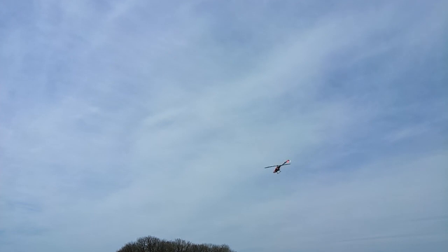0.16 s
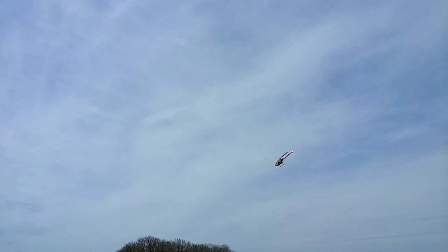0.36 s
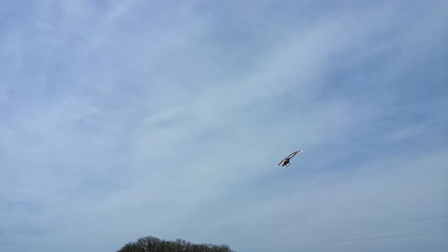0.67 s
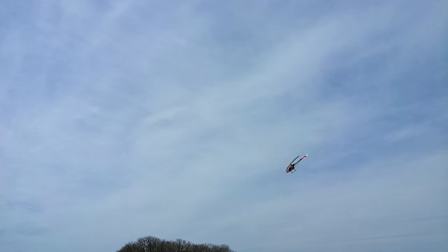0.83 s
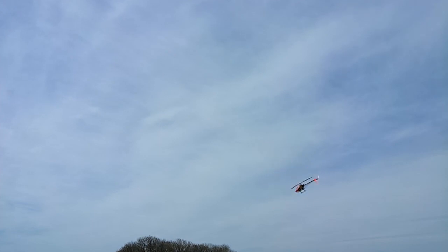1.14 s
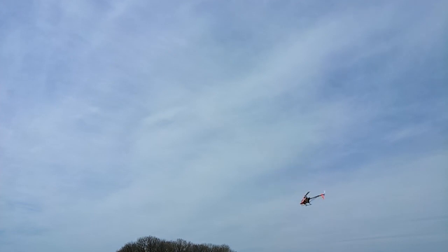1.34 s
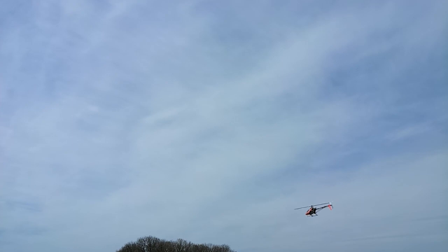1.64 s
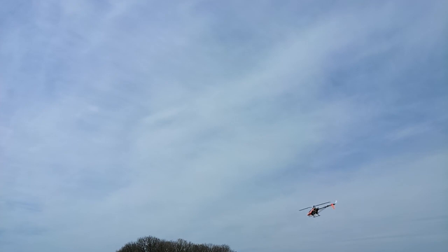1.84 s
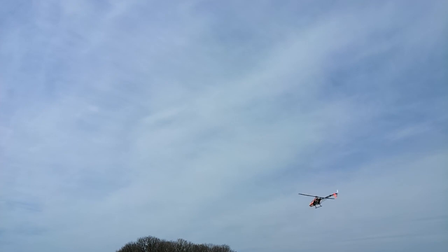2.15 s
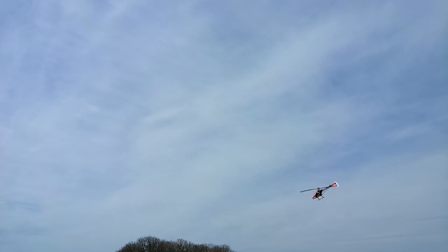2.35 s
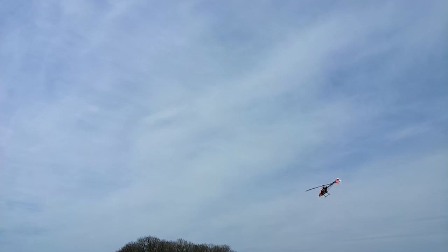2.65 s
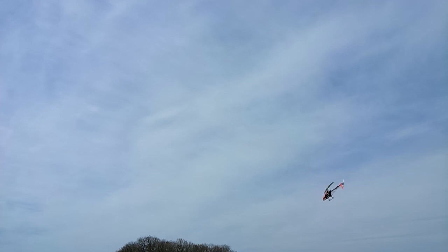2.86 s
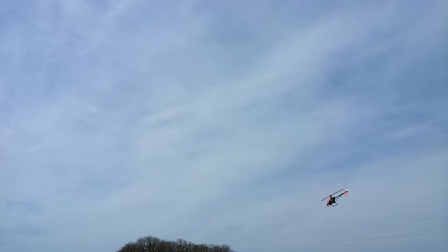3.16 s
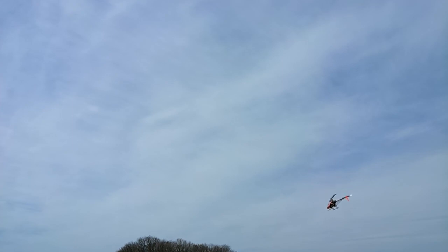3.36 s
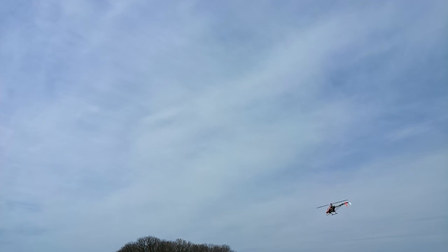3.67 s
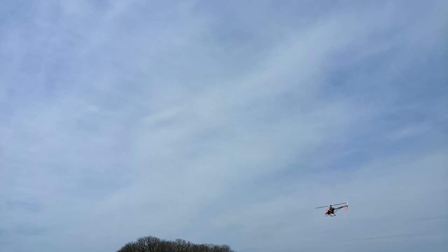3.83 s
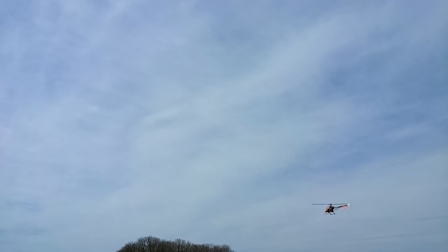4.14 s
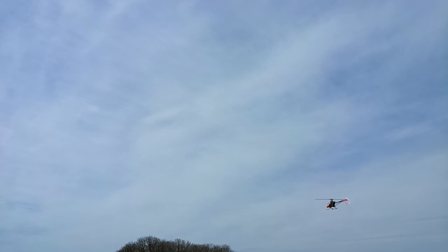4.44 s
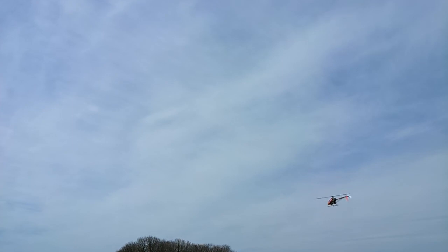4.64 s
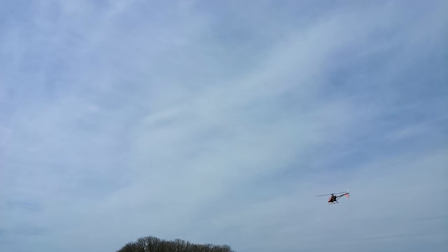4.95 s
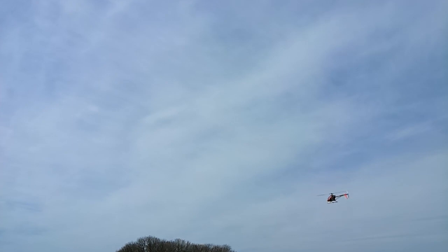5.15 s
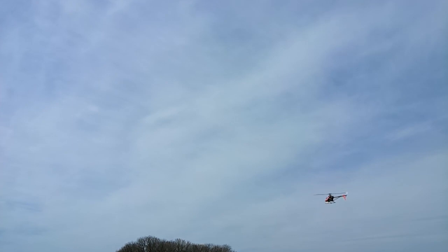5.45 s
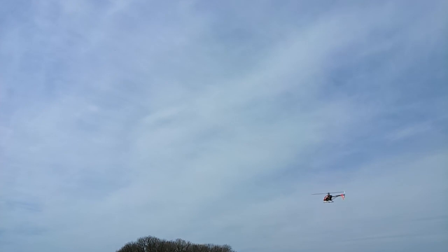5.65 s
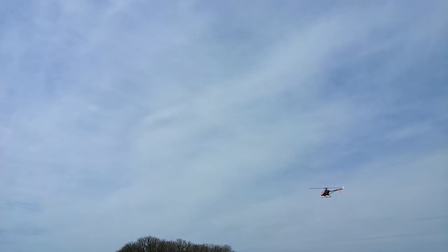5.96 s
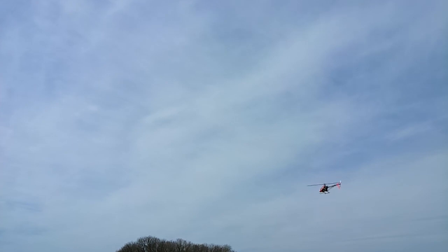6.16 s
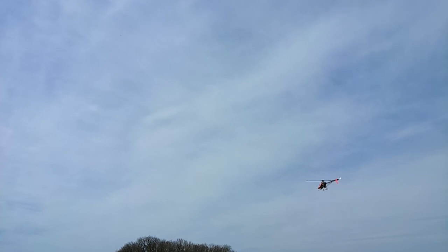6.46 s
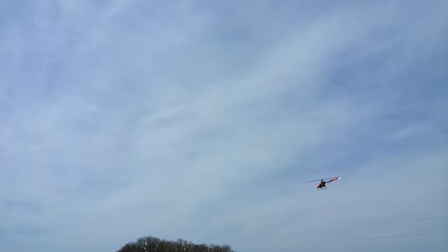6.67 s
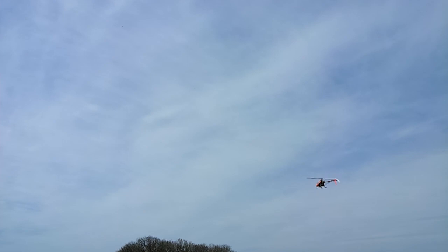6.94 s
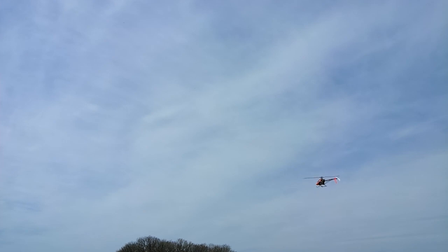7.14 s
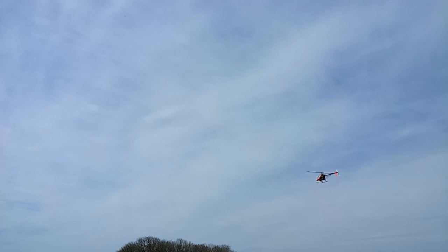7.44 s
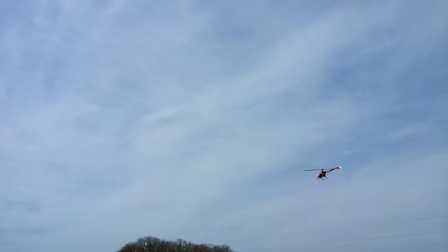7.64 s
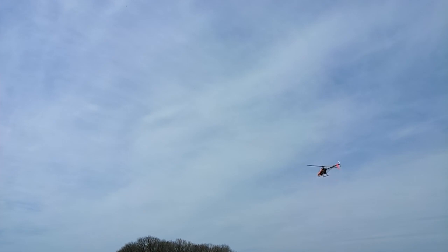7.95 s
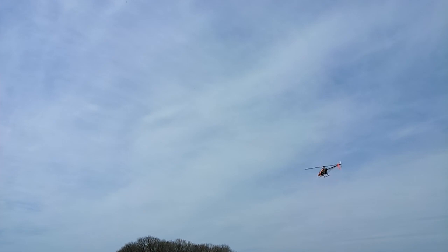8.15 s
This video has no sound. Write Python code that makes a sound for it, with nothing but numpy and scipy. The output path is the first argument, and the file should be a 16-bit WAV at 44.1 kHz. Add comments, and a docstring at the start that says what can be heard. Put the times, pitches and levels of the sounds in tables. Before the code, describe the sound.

Outdoors in an open field, a small electric model helicopter hovers at some distance, giving a nearly steady high gear whine and an airy blade hiss that flutter slightly. Wind strikes the bare stereo microphone: lighter bumps at first, then heavy thumps, low rumble and crackle from about two seconds, separate on each side and stronger on the right. The loudest gusts distort and briefly duck everything; the wind eases near the end while the whine continues.

```python
"""A small electric model helicopter whines over the hiss of its blades, while gusts thump and crackle left and right.
Gears, motor, tail drive and rotor are sums of sines locked to one drive speed; the hiss is noise throbbing
with the rotor. The wind is streams of short pressure swings and a low rumble, separate at each of a camera's
two microphone ports, over a faint field murmur. A gain control ducks everything after loud peaks, then it clips."""
import sys
import numpy as np
from scipy import signal
from scipy.fft import rfft, irfft, next_fast_len
from scipy.io import wavfile
from scipy.ndimage import uniform_filter1d, map_coordinates

SR = 44100
rng = np.random.default_rng(int(sys.argv[2]) if len(sys.argv) > 2 else 0)


def int16_out(signal):
    """Quantize to a 16-bit WAV file."""
    q = np.round(np.clip(np.atleast_2d(signal).T, -1, 1) * 32767)
    wavfile.write(sys.argv[1], SR, q.astype(np.int16))


N = 366030


def amp(db):
    """Gain of a level in dB."""
    return 10 ** (np.asarray(db) / 20)


def unit(x):
    """x at rms 1."""
    return x / np.sqrt(np.mean(x ** 2) + 1e-20)


def along(points, hz):
    """Interpolate (f/Hz, value) points on a log frequency axis."""
    f, v = np.transpose(points)
    return np.interp(np.log(hz + 1), np.log(f + 1), v)


def curves(rows):
    """One value per sample for each column after the time."""
    s, *cols = np.transpose(rows)
    return [np.interp(np.arange(N) / SR, s, c) for c in cols]


def wobble(rate_hz):
    """Smooth random curve, rate_hz knots a second."""
    knots = rng.standard_normal(int(N * rate_hz / SR) + 4)
    return map_coordinates(knots, [np.arange(N) * rate_hz / SR])


def filtered(x, response):
    """x times a complex response of frequency."""
    m = next_fast_len(N + 8192)
    return irfft(rfft(x, m) * response(np.fft.rfftfreq(m, 1 / SR)), m)[..., :N]


# main gear mesh rate: t/s, f/Hz
MESH_SPEED = [(0, 3717), (.21, 3721), (.81, 3691), (.91, 3683), (1.02, 3657), (1.3, 3629), (1.44, 3630),
              (1.74, 3648), (2, 3650), (2.39, 3693), (2.6, 3684), (2.9, 3655), (3.11, 3625), (3.2, 3624),
              (4.18, 3649), (5.2, 3646), (6.62, 3672), (7.36, 3657), (7.76, 3674), (8.3, 3674)]


def mesh_turns():
    """Phase of the main gear mesh in cycles; its speed wanders slightly and drives every shaft."""
    return np.cumsum(curves(MESH_SPEED)[0] + 2.5 * wobble(9)) / SR


def shaft(turns, tones, flutter_db, blur_rad):
    """Sines at multiples of a shaft's speed; moving air makes each flutter in level and phase."""
    total = 0
    for k, db in tones:
        level = amp(db + flutter_db * wobble(12))
        total = total + level * np.sqrt(2) * np.sin(2 * np.pi * k * turns + blur_rad * wobble(30))
    return total


PINION_TEETH, GEAR_TEETH, MESH_PER_TAIL_TURN = 11, 112, 29.06
# what faces the camera as the machine turns: t/s, tail drive level/dB, tail gear level/dB, main gear level/dB
FACING = [(0, -4.5, -27, 3.5), (.7, 0, -9, 4.5), (.85, 0.5, -5.5, 5), (1.3, -1, -1.5, -1),
          (1.8, 0, 0.5, 0.5), (2.5, -4.5, -3.5, 1), (3.3, 0.5, 2.5, 0.5), (4.2, 0, 3, 1),
          (5.1, -0.5, 2, -4), (6, 2.5, 2.5, 1.5), (6.9, -1.5, -1.5, 1), (7.6, 0, 1.5, 1),
          (8.3, -1.5, -2, 3)]
# tones of main gear mesh, tail drive, tail gears, motor, rotor: multiple of shaft speed, relative level/dB
MESH_TONES = [(1, -16), (2, -22), (3, -22)]
TAIL_TONES = [(2, -14), (4, -15), (6, -22), (8, -22), (12, -16.5), (22, -29.5), (26, -37), (27, -36),
              (31, -28), (33, -23), (39, -18.5), (40, -16), (41, -20.5), (80, -22)]
TAIL_GEAR_TONES = [(19.98, -11.5), (20.72, -21), (19, -17), (18.16, -20)]
MOTOR_TONES = [(6, -27), (10, -28), (16, -28), (21, -27), (23, -27), (24, -25), (28, -26), (29, -27),
               (30, -27), (31, -27), (32, -27), (34, -27)]
ROTOR_TONES = [(64, -26), (111, -28), (134, -29), (142, -23), (144, -29)]


def drive_whine(mesh):
    """Gears, tail drive, motor and rotor sing at fixed ratios of the mesh rate."""
    tail_db, tail_gear_db, gear_db = curves(FACING)
    tail = mesh / MESH_PER_TAIL_TURN
    whine = amp(gear_db) * shaft(mesh, MESH_TONES, flutter_db=3, blur_rad=1.1)
    whine += amp(tail_db) * shaft(tail, TAIL_TONES, flutter_db=3, blur_rad=0.64)
    whine += amp(tail_gear_db) * shaft(tail, TAIL_GEAR_TONES, flutter_db=3, blur_rad=1.05)
    whine += shaft(mesh / PINION_TEETH, MOTOR_TONES, flutter_db=3.5, blur_rad=0.41)
    whine += shaft(mesh / GEAR_TEETH, ROTOR_TONES, flutter_db=3, blur_rad=0.64)
    return whine


# throb of the hiss: multiple of rotor speed, depth [0-1]
THROB = [(1, .04), (2, .13), (3, .06), (4, .08), (6, .05)]
# left-right likeness of the hiss: f/Hz, likeness [0-1]
LIKENESS = [(300, .6), (2500, .7), (5000, .58), (8000, .42), (13000, .3)]


def blade_hiss(rotor):
    """Patchy noise swelled by each passing blade, part shared by the ports and part separate."""
    throb = 1 + sum(depth * np.cos(2 * np.pi * (k * rotor + rng.random())) for k, depth in THROB)
    spectra = signal.stft(rng.standard_normal((3, N + 512)), nperseg=512)[2]
    patches = uniform_filter1d(rng.standard_normal(spectra.shape[1:]), size=12, axis=0)
    patches = unit(uniform_filter1d(patches, size=10, axis=1))
    noise = signal.istft(spectra * amp(1.47 * patches), nperseg=512)[1][:, :N]
    shared, *own = throb * noise
    share = lambda hz: np.clip(along(LIKENESS, hz), 0, 1)
    common = filtered(shared, lambda hz: np.sqrt(share(hz)))
    return common + filtered(np.array(own), lambda hz: np.sqrt(1 - share(hz)))


# colour of each port towards the helicopter: f/Hz, level/dB
LEFT_COLOUR = [(100, -30.5), (250, -23), (1000, -12.5), (2300, -5.5), (3900, -9), (4700, -9), (5600, -15.5),
               (6100, -62), (6700, -13.5), (7400, -9), (8600, -7), (11000, 2), (12200, 2), (14300, -10.5),
               (14800, -20.5)]
RIGHT_COLOUR = [(100, -36), (250, -23), (1000, -18), (2100, -4), (3100, -6), (4600, 0), (5200, -6),
                (5700, -10.5), (6700, -13.5), (7300, -12), (8500, -13.5), (11000, -21), (12800, -31),
                (13800, -53)]
# phase by which the left port leads: f/Hz, lead [rad]
LEFT_LEAD = [(0, 7), (260, -4.5), (1380, -3), (3790, 0.57), (6120, 2.5), (9300, 7), (12400, 8.5),
             (13600, -2), (14000, 18), (14500, 1)]


def helicopter():
    """Whine and blade hiss from one drive, coloured and phase-shifted differently by the two ports."""
    mesh = mesh_turns()
    source = drive_whine(mesh) + blade_hiss(mesh / GEAR_TEETH)
    half_lead = lambda hz: np.exp(.5j * np.interp(hz, *np.transpose(LEFT_LEAD)))
    left = lambda hz: amp(along(LEFT_COLOUR, hz)) * half_lead(hz)
    right = lambda hz: amp(along(RIGHT_COLOUR, hz)) / half_lead(hz)
    return arriving(filtered(source, lambda hz: np.array([left(hz), right(hz)])))


# helicopter at the ports, before port_db: t/s, level/dB
ARRIVAL = [(0, -29.5), (.14, -25.5), (.37, -32), (.44, -26.5), (.7, -29), (.91, -24.5), (1.03, -28),
           (1.32, -24), (1.62, -26), (1.86, -25), (1.95, -22), (2.27, -26), (2.51, -23), (3.11, -25),
           (3.31, -22), (3.53, -24.5), (3.85, -28.5), (4.46, -24), (4.73, -28.5), (5.14, -24.5),
           (5.23, -27), (5.69, -26.5), (5.82, -29), (5.96, -21), (6.07, -25.5), (6.33, -27), (6.45, -25),
           (6.84, -26), (6.91, -24), (7.35, -27.5), (7.62, -21.5), (7.83, -30), (8.01, -23.5),
           (8.29, -27.5)]


def arriving(ports):
    """Moving air shakes the treble hardest: its quick wavers are deeper than those of the lower part."""
    level_db = curves(ARRIVAL)[0]
    waver_db = 1.6 * wobble(20)
    treble = filtered(ports, lambda hz: 1 / (1 + (6200 / (hz + 1)) ** 12))
    body_db = level_db + 0.48 * waver_db + 1.26 * wobble(30)
    treble_db = level_db + waver_db + 2.0 * wobble(34)
    port_db = 13
    return amp(port_db) * (amp(treble_db) * treble + amp(body_db) * (ports - treble))


# sharpest eddies, before the port leak: t/s, peak level/dB, f/Hz, port [0 left, 1 right]
SLAPS = [(0.732, 3, 890, 1), (1.509, 0, 730, 1), (1.598, 7, 796, 1), (1.626, 4.5, 756, 1),
         (1.698, 7.5, 520, 0), (2.012, 7, 580, 1), (2.082, 6, 580, 1), (2.221, 5, 656, 1),
         (2.355, 21, 960, 1), (2.391, 10.5, 1020, 1), (2.497, 13, 1045, 1), (2.514, 15.5, 900, 1),
         (2.722, 13, 470, 0), (2.889, 14, 800, 1), (2.902, 15, 1130, 1), (3.012, 20.5, 860, 1),
         (3.107, 11, 794, 1), (3.22, 9, 840, 1), (3.6, 4.5, 640, 1), (3.81, 11, 885, 1),
         (3.836, 15, 890, 1), (4.046, 8, 1430, 1), (4.095, 15, 710, 1), (4.113, 19, 1200, 1),
         (4.581, 12.5, 690, 1), (4.808, 10.5, 715, 1), (4.888, 13, 950, 1), (4.909, 19, 780, 1),
         (5.055, 2, 720, 1), (5.102, 13, 835, 1), (5.166, 27, 825, 1), (5.228, 16, 855, 1),
         (5.252, 21, 1100, 1), (5.287, 23, 1200, 1), (5.413, 1.5, 745, 1), (5.506, 22, 850, 1),
         (5.533, 15, 760, 1), (5.744, 12.5, 600, 0), (5.895, 17, 1020, 1), (5.949, 16, 570, 1),
         (6.029, 18, 810, 1), (6.218, 21.5, 1160, 1), (6.268, 10, 750, 1), (6.296, 12.5, 1260, 1),
         (6.481, 11, 820, 1), (6.494, 15, 1210, 1), (7.001, 8, 810, 1), (7.291, 3, 670, 1),
         (7.379, 12.5, 724, 1), (7.504, 3.5, 740, 1), (7.554, 3.5, 740, 1), (7.734, 1.5, 580, 1),
         (7.806, 4.5, 670, 1), (7.857, 0, 623, 1)]
# low wind rumble, shape only: f/Hz, level/dB
RUMBLE = [(20, -26), (60, -50), (130, -8.5), (250, 0.5), (400, -4), (700, -20.5), (1500, -33), (4000, -120)]


def buffet(port, base_hz, eddy_db, crackle_db, count=1700):
    """Random stream of eddies over one port; in stronger wind they are faster, so brighter."""
    level_db = wind_db(port)
    s = np.sort(rng.random(count)) * (N - 1) / SR
    size, tone = rng.exponential(size=count), rng.standard_normal(count)
    local_db = (level_db + 4 * wobble(45))[(s * SR).astype(int)]
    hz = np.clip(base_hz * amp(0.22 * (local_db + 18.5) + 0.46 * size + 2.5 * tone), 90, 2500)
    stream = eddies(s, local_db + eddy_db + 3.34 * np.minimum(size, 3.5), hz, cycles=1.0)

    slap_s, slap_db, slap_hz, _ = np.transpose([row for row in SLAPS if round(row[-1]) == port])
    sharp = eddies(slap_s, slap_db, slap_hz, cycles=0.95)

    rumble = unit(filtered(rng.standard_normal(N), lambda f: amp(along(RUMBLE, f))))
    rumble = amp(level_db - 10.0 + 4.5 * wobble(30)) * rumble

    # eddies shed a crackle of small fast ones, growing faster than the wind
    shed_s = s[:, None] + .004 * rng.exponential(size=(count, 2))
    fine_db = local_db[:, None] + crackle_db + 0.65 * (local_db[:, None] + 13.5)
    fine_db = fine_db + 3 * rng.exponential(size=(count, 2))
    fine_hz = 2.75 * base_hz * amp(3.3 * rng.standard_normal((count, 2)))
    crackle = eddies(shed_s.ravel(), fine_db.ravel(), fine_hz.ravel(), cycles=1.0)

    air = stream + sharp + crackle + rumble
    # the port leaks slow pressure away
    return filtered(air, lambda f: (1j * f / (95 + 1j * f)) ** 2)


def eddies(s, db, hz, cycles):
    """Each eddy is a swing of pressure a cycle or two long, fastest at its peak and slowing after it."""
    t = np.arange(-SR // 100, SR // 50) / SR
    u = t * hz[:, None]  # cycles from the peak
    start, slow = rng.random((2, len(s), 1))
    shape = np.where(u < 0, np.exp(-(u / (0.32 * cycles)) ** 2), np.exp(-abs(u / cycles) ** 1.8))
    swing = np.cos(2 * np.pi * (start + u / (1 + .5 * slow * abs(u) + 0.17 * np.maximum(u, 0))))
    pulses = amp(db)[:, None] * shape * swing
    at = np.round(s * SR).astype(int)[:, None] + np.arange(len(t))
    return np.bincount(at.ravel(), pulses.ravel(), N + SR)[SR // 100:][:N]


# steady wind, before the 0.93 dB scaling: t/s, left level/dB, right level/dB
WIND = [(0, -37, -26), (.13, -34, -38), (.3, -31, -23.5), (.76, -33, -26), (.85, -37.5, -48),
        (1.34, -37, -44), (1.62, -27, -16), (1.95, -27.5, -28), (2.17, -27, -29), (2.3, -17, -7),
        (2.82, -21, -28), (2.95, -23, -2), (3.2, -15, -12.5), (3.42, -40, -17), (3.49, -33, -37),
        (3.57, -35, -33), (3.7, -8.5, -9.5), (3.85, -16, -8), (4.2, -30, -19.5), (4.75, -19, -17),
        (5.0, -15, -7.5), (5.56, -7, -2), (5.87, -21.5, -17.5), (6.15, -21.5, -19), (6.39, -26, -30.5),
        (7.01, -26.5, -11), (7.33, -35, -35), (7.95, -28, -11), (8.15, -36, -38), (8.29, -35, -16.5)]
# gusts that hit one port: middle t/s, length [s], peak level/dB, port [0 left, 1 right]
GUSTS = [(0.01, 0.04, -13, 1), (0.196, 0.06, -16, 1), (0.286, 0.03, -14, 1), (0.302, 0.051, -15.5, 0),
         (0.504, 0.062, -19.0, 0), (0.522, 0.021, -17.5, 1), (0.632, 0.062, -15.5, 1),
         (0.755, 0.07, -13.5, 1), (0.803, 0.1, -18, 0), (0.904, 0.048, -24.5, 1), (1.274, 0.074, -28, 0),
         (1.416, 0.046, -17.5, 1), (1.505, 0.026, -13, 1), (1.53, 0.079, -26, 0), (1.592, 0.031, -7.5, 1),
         (1.705, 0.11, -7.5, 0), (1.78, 0.082, -8, 1), (1.995, 0.036, -10, 1), (2.09, 0.042, -12.5, 1),
         (2.184, 0.1, -15, 0), (2.248, 0.051, 1, 1), (2.28, 0.075, -1.5, 0), (2.357, 0.053, -1.5, 1),
         (2.516, 0.088, -2.5, 1), (2.562, 0.055, 1.5, 0), (2.612, 0.17, -3, 0), (2.658, 0.075, -10, 1),
         (2.73, 0.049, -8, 0), (2.76, 0.047, -5.5, 1), (2.839, 0.05, -8.0, 0), (2.894, 0.05, 3, 1),
         (3.01, 0.05, -5, 1), (3.07, 0.18, -3, 0), (3.17, 0.058, -4.5, 0), (3.219, 0.021, -5, 1),
         (3.35, 0.14, -13, 1), (3.413, 0.078, -15.0, 0), (3.634, 0.056, -6.5, 1), (3.742, 0.031, -3, 1),
         (3.804, 0.076, -2.5, 0), (3.825, 0.037, -3, 1), (3.903, 0.031, -10, 0), (3.994, 0.074, -12.5, 1),
         (3.996, 0.041, -12.0, 0), (4.077, 0.11, -6.0, 1), (4.15, 0.16, -14.0, 0), (4.196, 0.044, -12.5, 1),
         (4.294, 0.045, -20, 1), (4.375, 0.041, -14.5, 0), (4.405, 0.03, -5, 1), (4.458, 0.04, -4.5, 1),
         (4.452, 0.16, -13.0, 0), (4.573, 0.075, -8, 1), (4.697, 0.13, -9.5, 0), (4.71, 0.043, -12.5, 1),
         (4.902, 0.067, 2, 1), (4.9, 0.075, -14, 0), (5.105, 0.033, 2, 1), (5.123, 0.1, -12, 0),
         (5.19, 0.062, -0.5, 1), (5.365, 0.04, -11, 1), (5.487, 0.073, -4, 0), (5.52, 0.12, -4.5, 1),
         (5.67, 0.057, -16, 1), (5.696, 0.028, -8, 0), (5.792, 0.078, -2, 0), (5.887, 0.036, -9.0, 1),
         (5.952, 0.042, -18, 0), (6.04, 0.056, -1, 0), (6.035, 0.097, 1.5, 1), (6.125, 0.024, 1, 1),
         (6.137, 0.068, -4, 0), (6.223, 0.084, 1, 1), (6.27, 0.088, -9, 0), (6.346, 0.054, -10.5, 1),
         (6.483, 0.029, 0.5, 1), (6.552, 0.1, -16, 0), (6.559, 0.19, -5.5, 1), (6.7, 0.067, -13.5, 0),
         (6.907, 0.085, -15, 1), (6.95, 0.15, -20, 0), (7.037, 0.18, -12.5, 1), (7.09, 0.067, -16, 0),
         (7.282, 0.047, -11.5, 1), (7.39, 0.029, -6, 1), (7.416, 0.056, -18, 0), (7.532, 0.17, -13.5, 1),
         (7.654, 0.038, -14, 1), (7.733, 0.02, -9.5, 1), (7.805, 0.021, -11, 1), (7.843, 0.091, -23, 0),
         (7.866, 0.031, -14.5, 1), (7.937, 0.066, -10, 1)]


def wind_db(port):
    """Steady wind with a random sway, and over it the flat-topped gusts that hit this port, summed as power."""
    sway_db = 3.5 * wobble(24)
    power = amp(1.86 * (curves(WIND)[port] + sway_db))  # 1.86 = 2 * 0.93
    t = np.arange(N) / SR
    for s, length, db, _ in [row for row in GUSTS if round(row[-1]) == port]:
        near = slice(max(round((s - 2 * length) * SR), 0), round((s + 2 * length) * SR))
        power[near] += amp(2 * db) * np.exp(-abs(2 * (t[near] - s) / length) ** 2.8)
    return 10 * np.log10(power)


# murmur of the open field, shape only: f/Hz, level/dB
FIELD = [(60, -12), (250, -7.5), (900, -7), (1700, 10.5), (2600, -57)]


def field():
    """Faint steady noise, different at each port."""
    noise = rng.standard_normal((2, N))
    return amp(-43.0) * unit(filtered(noise, lambda hz: amp(along(FIELD, hz)) * (hz < 4000)))


DUCK_FROM_DB, DUCK_DB_PER_MEAN_DB_OVER, DUCK_MEMORY_S = -4, 4.25, .18


def ducked(x):
    """Every 10 ms the gain control lowers the gain by how far its recent output peaks went over the threshold."""
    step = SR // 100
    blocks = abs(x[:, :N // step * step]).reshape(2, -1, step)
    peaks_db = 20 * np.log10(blocks.max(axis=(0, 2)) + 1e-9)
    keep, mean_over_db, gain_db = np.exp(-step / SR / DUCK_MEMORY_S), 0, []
    for peak_db in peaks_db:
        gain_db.append(-DUCK_DB_PER_MEAN_DB_OVER * mean_over_db)
        output_db = min(peak_db + gain_db[-1], 0)
        mean_over_db = keep * mean_over_db + (1 - keep) * max(output_db - DUCK_FROM_DB, 0)
    return x * amp(np.interp(np.arange(N), step * np.arange(len(gain_db)), gain_db))


def scene():
    """Helicopter under wind on both ports, over the field."""
    left = buffet(0, base_hz=265, eddy_db=-1.0, crackle_db=-25)
    right = buffet(1, base_hz=346, eddy_db=0.5, crackle_db=-12)
    return helicopter() + np.array([left, right]) + field()


def record(dry):
    """Gain control, then overload just under full scale; nothing is kept above the band limit."""
    top, band_limit_hz = .99, 14912
    level = ducked(dry)
    clipped = level / (1 + abs(level / top) ** 30) ** (1 / 30)
    return np.clip(filtered(clipped, lambda hz: hz < band_limit_hz), -1, 1)


dry = scene()
out = record(dry)
int16_out(out)
```